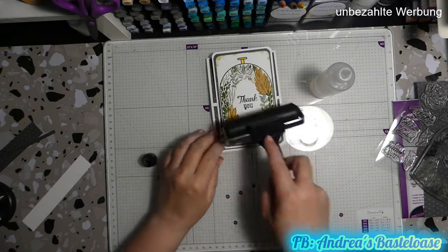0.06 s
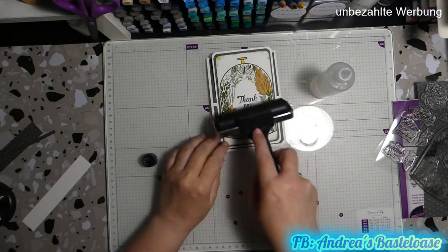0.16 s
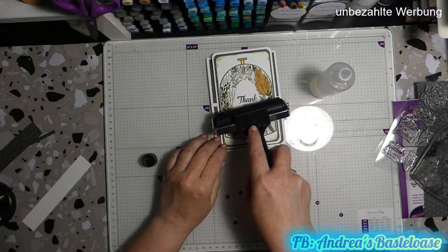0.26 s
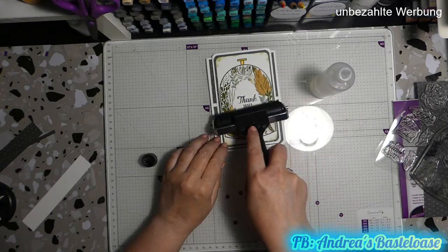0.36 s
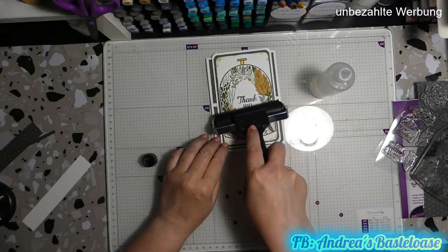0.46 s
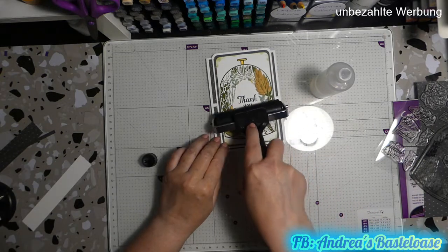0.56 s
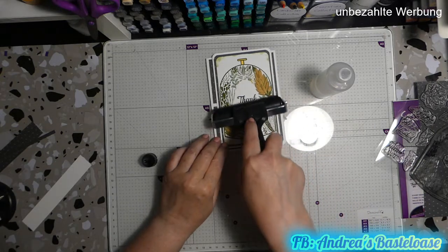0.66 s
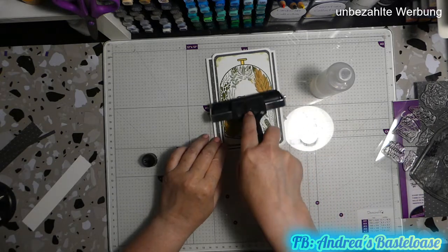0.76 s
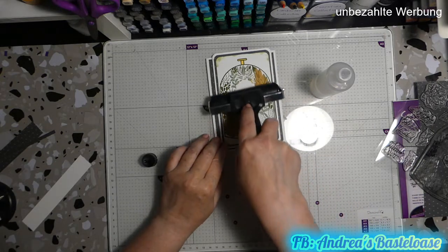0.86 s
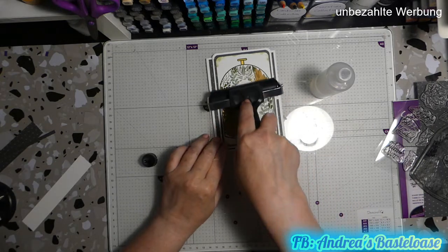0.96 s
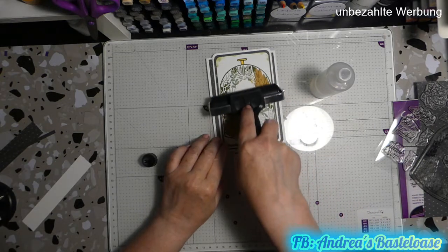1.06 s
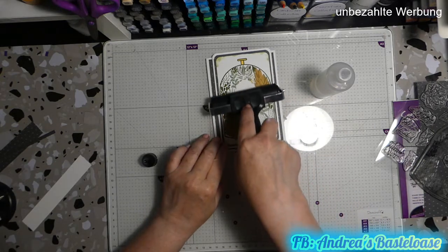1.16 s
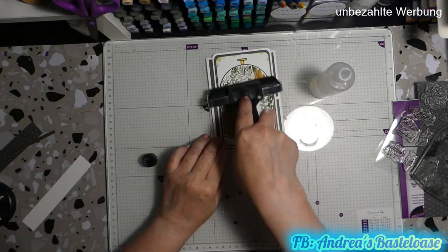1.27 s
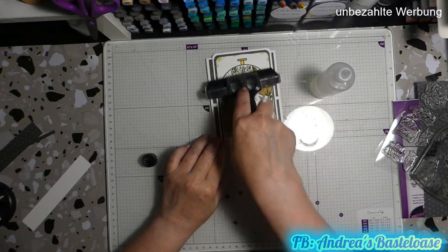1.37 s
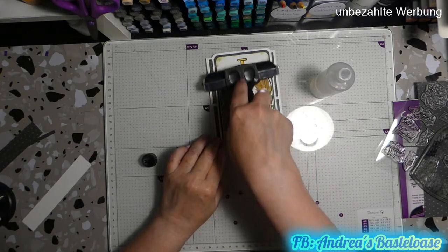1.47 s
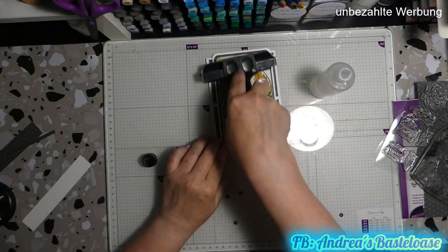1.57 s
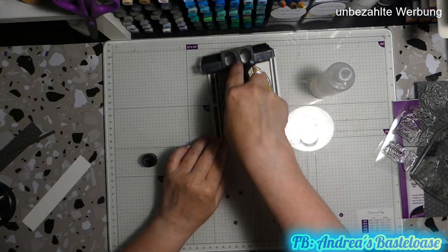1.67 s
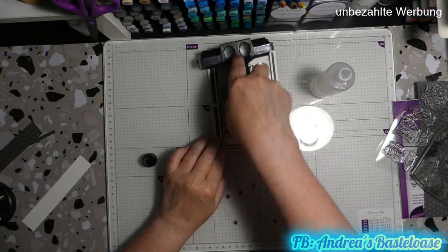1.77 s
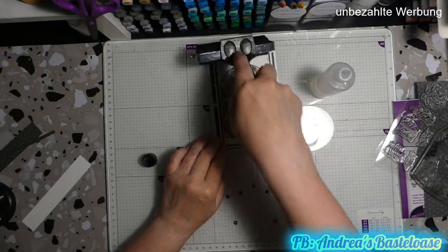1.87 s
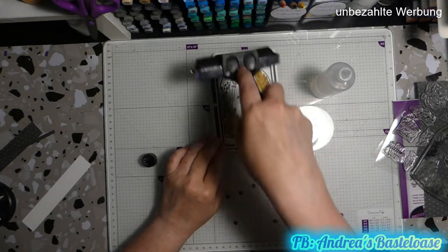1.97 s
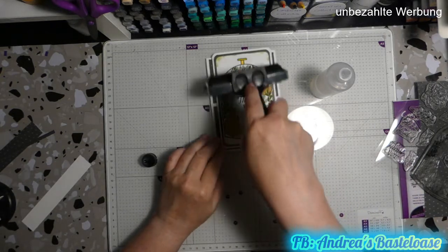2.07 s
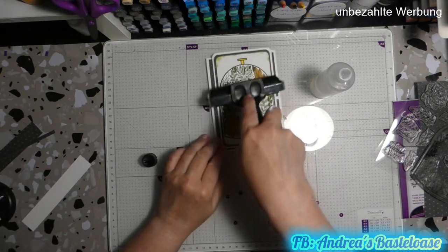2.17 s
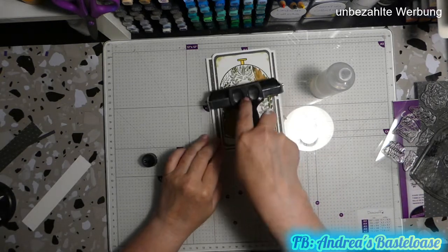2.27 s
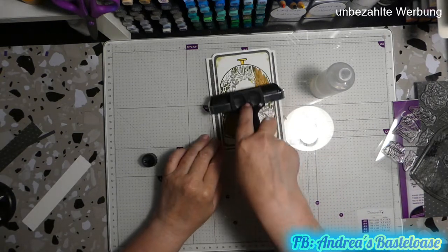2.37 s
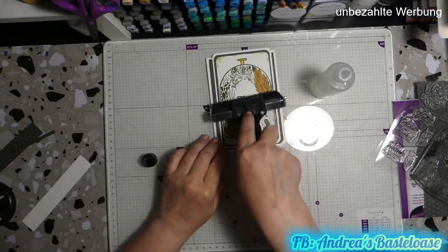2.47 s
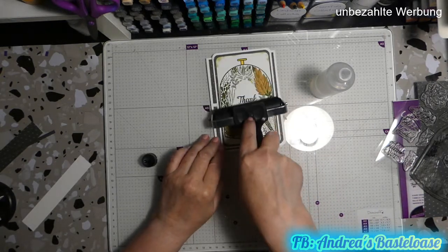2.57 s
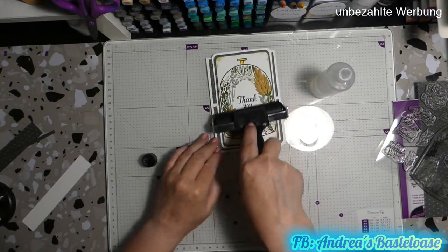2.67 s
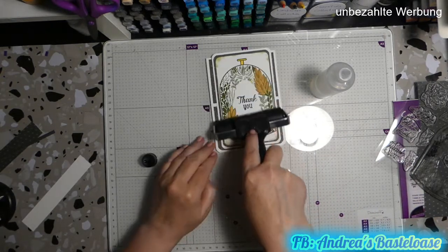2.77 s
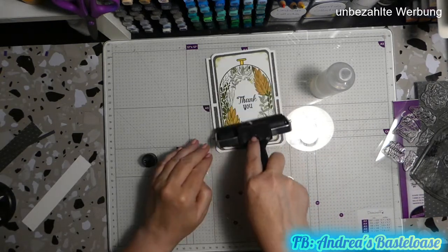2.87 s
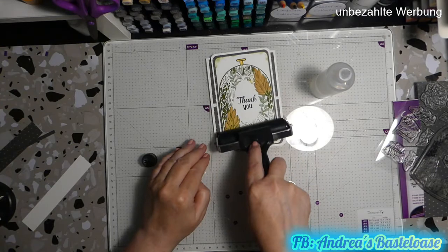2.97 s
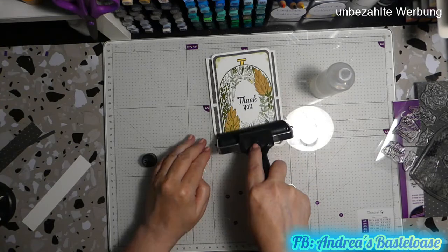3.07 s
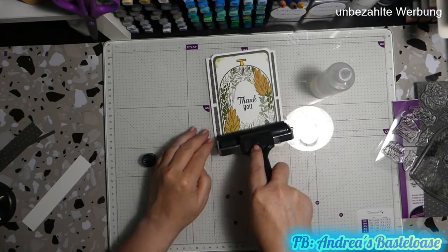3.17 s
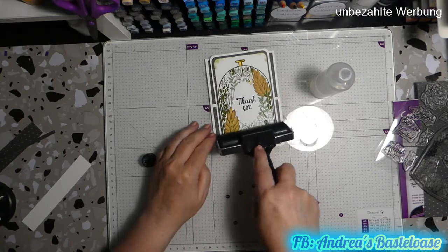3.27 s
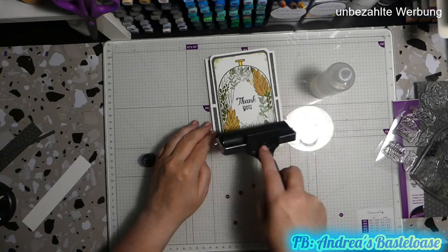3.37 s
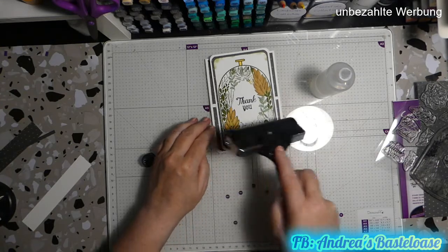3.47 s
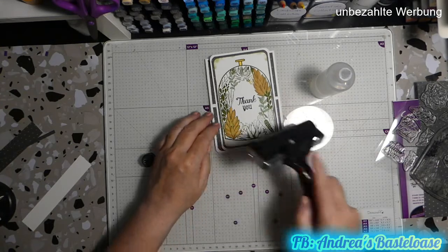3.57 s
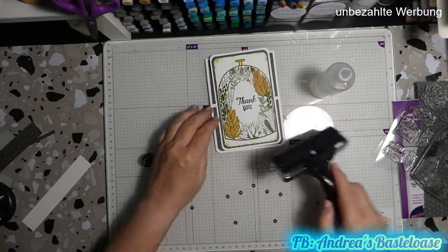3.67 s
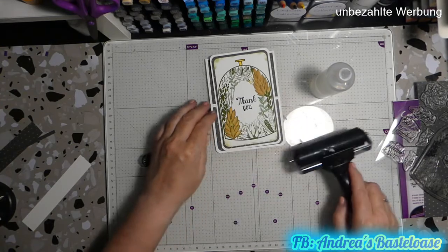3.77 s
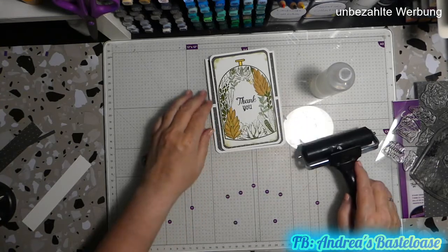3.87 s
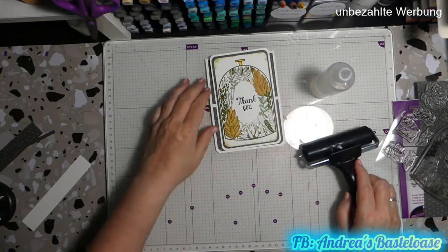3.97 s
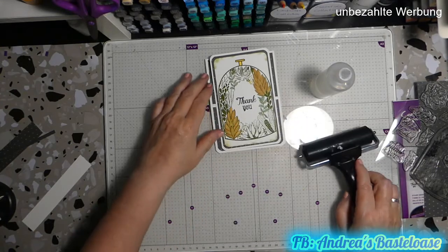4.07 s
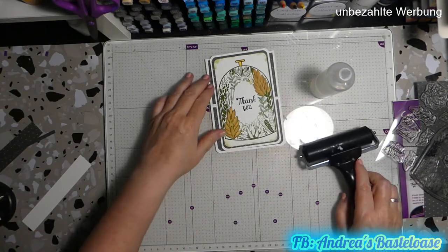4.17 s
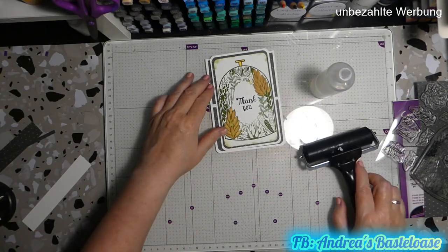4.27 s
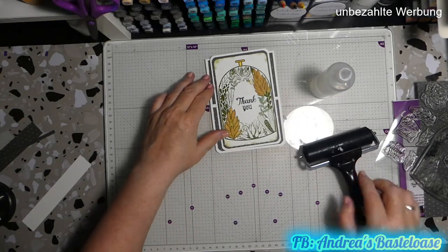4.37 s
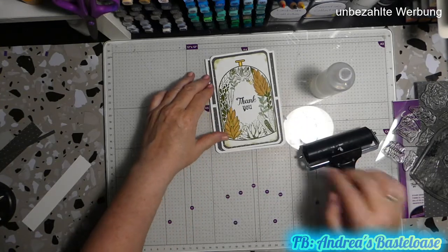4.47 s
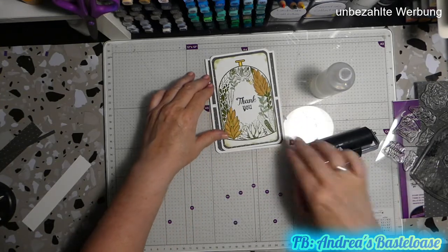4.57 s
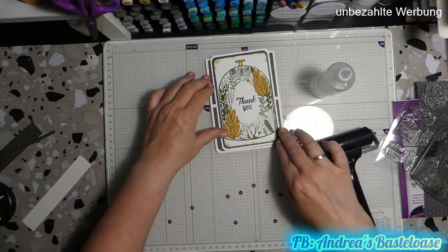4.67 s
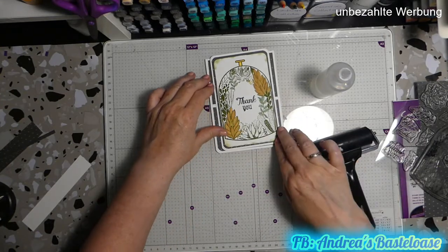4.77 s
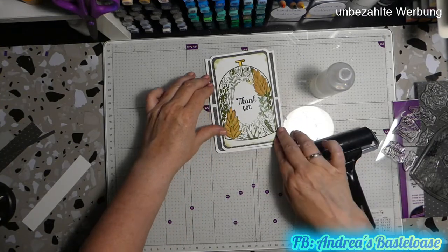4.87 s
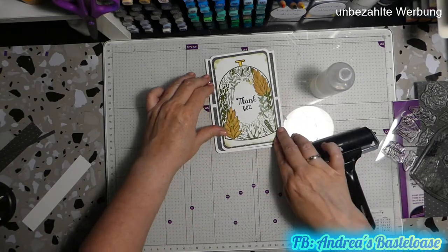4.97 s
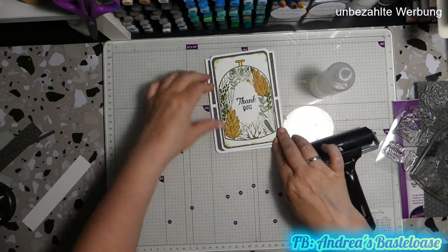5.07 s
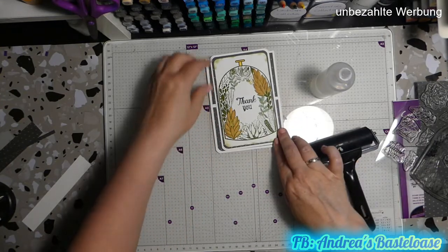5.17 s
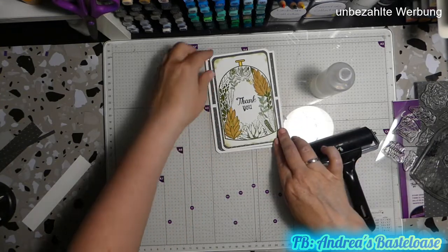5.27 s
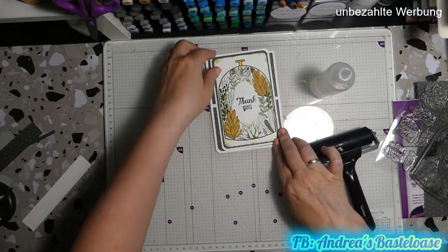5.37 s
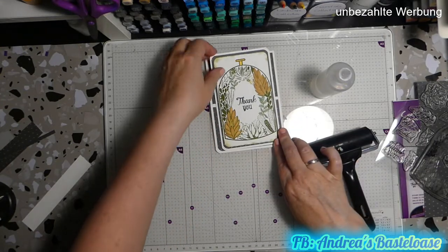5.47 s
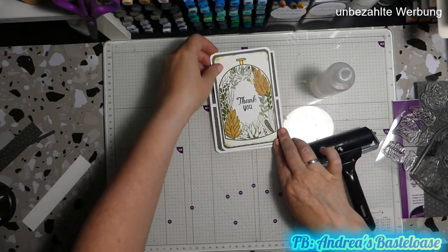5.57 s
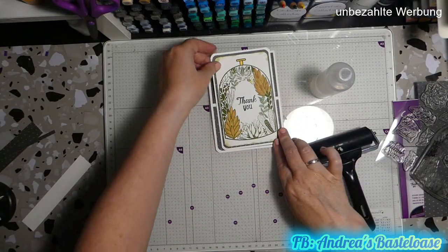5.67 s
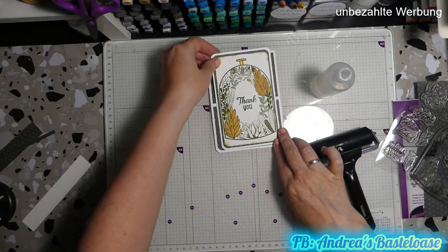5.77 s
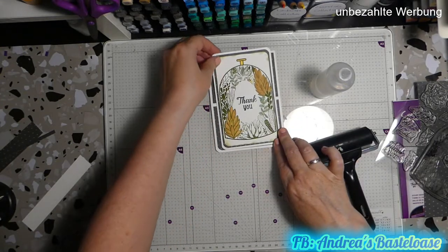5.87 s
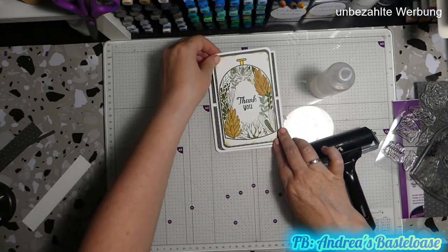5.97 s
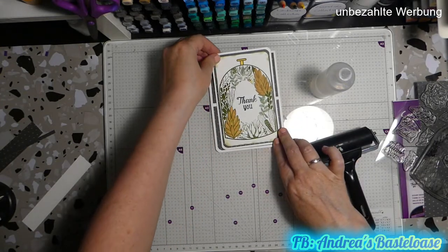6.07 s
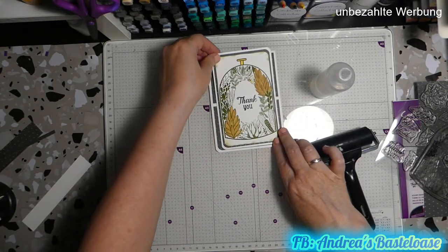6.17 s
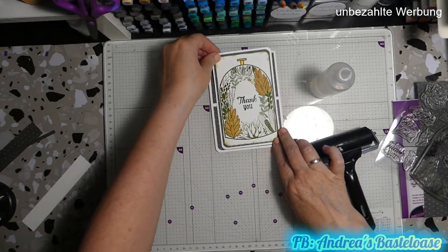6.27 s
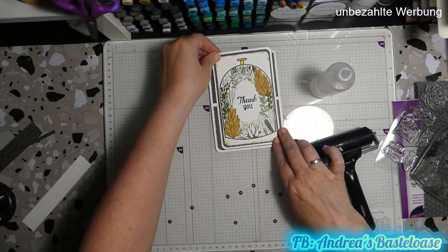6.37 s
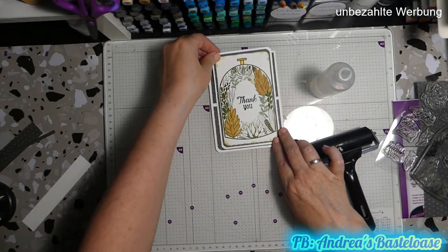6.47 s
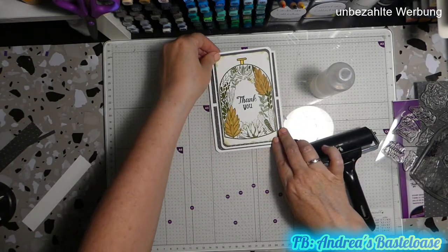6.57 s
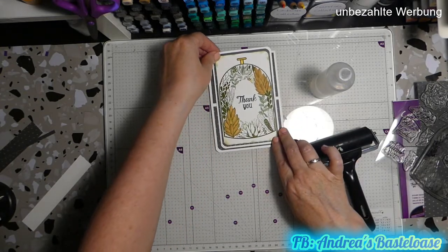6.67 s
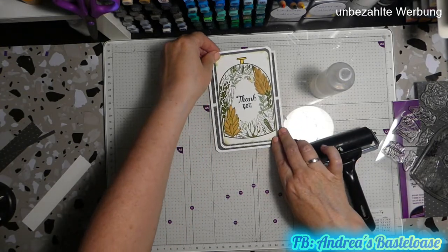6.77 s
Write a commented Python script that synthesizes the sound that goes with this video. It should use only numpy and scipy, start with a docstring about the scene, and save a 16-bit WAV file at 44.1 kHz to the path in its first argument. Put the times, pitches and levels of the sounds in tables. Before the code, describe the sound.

A steady, soft, wide hiss of room air and microphone noise runs throughout. At about 0.3 seconds a rubber roller lands on a craft table with a clustered, dull thud and a slight rub. From 0.6 to 3.1 its sticky drum fizzes very faintly over paper in three pushes, with dry axle ticks, the clearest near 1.0, and weak plastic knocks around 1.8 and 2.4. A small rub at 3.15 leads to a tight, bright click cluster at 3.25 as it is lifted. At 3.9 the drum hits the table with a loud, woody thump; at 4.23 the plastic handle drops with a loud, hard clack and brief chatter. Afterwards fingers land softly near 4.9, 5.0, 5.3 and 6.4, with faint card rubs around 5.6 to 5.9 and 6.7. The room is small and dry, the microphone overhead.

```python
"""A hand roller is put on a paper card on a craft table, rolled up and back, lifted and laid aside.
The tacky drum fizzes off the paper as filtered crackle; its loose axle ticks in short decaying modes.
The rubber drum thumps the table and the plastic handle drops with a clack: modes plus noise bursts.
Then fingers nudge the card, with soft thumps and rubs of crackle. The room is small and dry;
a hissy camera microphone hangs overhead, with a limiter."""
import sys
import numpy as np
from scipy import signal
from scipy.fft import rfft, irfft
from scipy.io import wavfile
from scipy.ndimage import minimum_filter1d

SR = 44100
rng = np.random.default_rng(int(sys.argv[2]) if len(sys.argv) > 2 else 0)


def output_pcm(signal):
    """Save a mono or channel-first signal as 16-bit PCM at the path in sys.argv[1].

    Samples are clipped to [-1, 1] before scaling.
    """
    pcm = np.clip(np.atleast_2d(signal).T, -1, 1) * 32767
    wavfile.write(sys.argv[1], SR, np.round(pcm).astype(np.int16))


N = 301203  # length in samples


def amp(db):
    """Turns dB into an amplitude factor."""
    return 10 ** (np.asarray(db) / 20)


def unit(x):
    """Scales to an energy of one."""
    return x / np.sqrt(np.sum(x ** 2) + 1e-30)


def read(points, hz):
    """Joins points by straight lines on a log-frequency axis."""
    f, value = np.transpose(points)
    return np.interp(np.log(hz + 1), np.log(f + 1), value)


def add(mix, s, sound):
    """Mixes a sound in at time s."""
    part = mix[round(s * SR):][:len(sound)]
    part += sound[:len(part)]


def colour(x, points, tilt_db=0, size=4096):
    """Causal minimum-phase filter with the given spectrum, tilted by dB per octave."""
    hz = np.maximum(abs(np.fft.fftfreq(size, 1 / SR)), 20)
    log_gain = np.log(amp(read(points, hz) + tilt_db * np.log2(hz)))
    spectrum = np.exp(np.conj(signal.hilbert(log_gain)))
    taps = np.fft.ifft(spectrum).real
    return signal.oaconvolve(x, taps[:size // 2])[:len(x)]


def soften(x, hz, order=2):
    """A softer contact lasts longer and leaves the high modes quiet."""
    low_pass = signal.butter(order, min(hz, .45 * SR), fs=SR, output="sos")
    return signal.sosfilt(low_pass, x)


def at_level(x, db):
    """Gives a blow the energy of 5 ms at this rms level."""
    return amp(db) * unit(x) * np.sqrt(.005 * SR)


def crackle(length, per_s, spread_db):
    """Tiny slips at random moments, a few of them large."""
    chance = rng.random(length)
    size = rng.exponential(1, length)
    sign = rng.standard_normal(length)
    return sign * amp(spread_db * np.minimum(size, 4)) * (chance < per_s / SR)


def ring(modes, tilt_db=0, opposed=False, size=16384):
    """Decaying modes; opposed neighbours cancel at first, so their sum swells and beats."""
    t = np.arange(size) / SR
    out = np.zeros(size)
    for k, (hz, db, t60) in enumerate(modes):
        mode = unit(amp(-60 * t / t60) * np.sin(2 * np.pi * hz * t))
        sign = (-1) ** (k * opposed)
        out += sign * amp(db + tilt_db * np.log2(hz)) * mode
    return unit(out)


def burst(grain, t60, crack_db, tilt_db=0, size=16384):
    """The crack of first contact, then dense modes that die fast."""
    t = np.arange(size) / SR
    push = unit(rng.standard_normal(size) * amp(-60 * t / t60))
    push[0] += amp(crack_db)
    return unit(colour(push, grain, tilt_db))


# Spectrum of room air and microphone noise. Each row: frequency in Hz, relative level in dB per Hz.
HISS = [(15, -43.5), (25, -9.5), (70, -16.5), (149, -4), (373, -7), (416, -2), (451, -7), (677, -9.5),
        (911, -10.5), (1370, -14), (1520, -16.5), (1740, -14), (3430, -21), (10100, -19), (16000, -22.5)]
# One resonance where the room noise gathers. A single row: frequency in Hz, width in Hz, boost in dB.
AIR_MODE = (420, 30, 3)
# Stereo width of the noise. Each row: frequency in Hz, side against mid in dB.
HISS_WIDTH = [(60, 6.5), (110, 5.5), (200, 10), (380, 6), (700, 5.5), (1290, 4.5), (2380, 1.5),
              (4400, -1.5), (8120, -4.5), (15000, -2.5)]
# Balance of the noise. Each row: frequency in Hz, left against right in dB.
HISS_LEAN = [(60, 0), (200, -3), (700, -1.5), (2400, -.5), (8000, .5)]
HISS_DB = -59  # rms of the mean of both channels


def hiss():
    """Steady room air and microphone noise: wide in the bass, central in the treble."""
    hz = np.fft.rfftfreq(N, 1 / SR)
    mode_hz, width, mode_db = AIR_MODE
    resonance_db = mode_db / (1 + (2 * (hz - mode_hz) / width) ** 2)
    shape = amp(read(HISS, hz) + resonance_db)
    mid, side = rfft(rng.standard_normal((2, N))) * shape
    side = side * amp(read(HISS_WIDTH, hz))
    lean = amp(read(HISS_LEAN, hz) / 2)
    pair = irfft(np.array([(mid + side) * lean, (mid - side) / lean]), N)
    return amp(HISS_DB) * pair / pair.mean(0).std()


# Surfaces near the table. Each row: delay in seconds, strength against the direct sound.
ECHOES = [(.0013, 0.087), (.0021, 0.16), (.0033, .2), (0.017, 0.074)]
# Dying away of the small dry room. Each row: frequency in Hz, time to fall 60 dB in seconds.
ROOM_T60 = [(120, 0.23), (400, 0.27), (1500, 0.16), (5000, 0.18), (12000, .15)]
# Strength of the room's tail at mid. Each row: frequency in Hz, level against the direct sound in dB.
ROOM_COLOUR = [(120, -13), (400, -13.5), (1500, -11.5), (5000, -12.5), (12000, -14)]
# Echoes unlike at the microphone's two ports. Each row: frequency in Hz, level in dB.
SCATTER = [(100, -19), (700, -14), (2500, -10), (5000, -14), (9000, -10), (16000, -11)]


def room(x, side_share=.6, onset_s=.003, scatter_t60=0.017, size=22050):
    """Direct sound, echoes off nearby surfaces and a short diffuse tail."""
    age = np.arange(size) / SR
    near = np.zeros(size)
    near[0] = 1
    for delay, strength in ECHOES:
        add(near, delay, np.array([strength]))
    hz, t, z = signal.stft(rng.standard_normal((2, size)), SR, nperseg=256)
    t60 = read(ROOM_T60, hz)[:, None]
    decay = amp(read(ROOM_COLOUR, hz)[:, None] - 60 * t / t60)
    # a longer tail starts lower, so that the colour sets its energy
    z = z * decay * np.sqrt(2 * np.log(1000) / (t60 * SR))
    tail = signal.istft(z, SR, nperseg=256)[1][:, :size]
    mid, side = tail * (1 - np.exp(-age / onset_s))
    # clutter on the table scatters the first milliseconds differently to each port
    scatter = unit(rng.standard_normal(size) * amp(-60 * age / scatter_t60))
    side = side_share * side + colour(scatter, SCATTER)
    response = unit(near) + np.array([mid + side, mid - side])
    return signal.fftconvolve(x[None], response, axes=1)[:, :N]


# Modes of the table with its mat. Each row: frequency in Hz, relative energy in dB, t60 in seconds.
TABLE_MODES = [(210, -12.5, 0.15), (429, 4.5, .045), (470, -7.5, 0.14), (593, -5.5, 0.036),
               (734, -3.5, 0.057), (840, -5, .03), (990, -9, .03), (1190, -13, 0.13), (1310, -22, 0.057)]
# Dense upper modes of the table. Each row: frequency in Hz, relative level in dB per Hz.
TABLE_GRAIN = [(60, -37), (120, -8.5), (300, -6.5), (1200, -2), (2400, -6), (3500, -6), (5000, -6),
               (16000, -16.5)]
# Low standing waves of the room. Each row: frequency in Hz, relative energy in dB, t60 in seconds.
STANDING = [(128, -7, 0.14), (151.4, -2, 0.15), (197, -2.5, .14), (238, 2.5, 0.14), (272, -13, .08),
            (370, 1.5, 0.085), (400, -5, .06)]


def thump(hz, grain_db=-11, boom_db=-3, boom_delay_s=.009):
    """One blow on the table; the room booms a moment later."""
    blow = ring(TABLE_MODES) + amp(grain_db) * burst(TABLE_GRAIN, t60=.06, crack_db=-11.5)
    add(blow, boom_delay_s, amp(boom_db) * ring(STANDING, opposed=True))
    return soften(blow, hz, order=4)


# Fingertips landing on card and mat.
# Each row: start in seconds, level in dB over 5 ms, hardness as a cut-off in Hz.
TOUCHES = [(4.866, -50, 300), (5.005, -46, 798), (5.33, -50.5, 260), (6.412, -56.5, 700),
           (6.447, -54.5, 1100)]


def fingertips():
    """Fingertips land on the table as soft thumps without rebound."""
    out = np.zeros(N)
    for s, db, hz in TOUCHES:
        add(out, s, at_level(thump(hz), db))
    return out


# Fingers and card rubbing.
# Each row: start in seconds, length in seconds, rms level in dB, tilt in dB per octave.
RUBS = [(.322, .052, -52.5, 3), (1.073, 0.031, -54.5, -3), (2.379, .049, -56, 4.5),
        (3.157, .045, -49.5, -3), (3.427, .052, -57.5, -2), (3.623, 0.1, -60.5, 2.5),
        (5.581, 0.06, -57.5, 3), (5.646, 0.043, -56, -2), (5.698, 0.29, -61.5, 2),
        (5.8, 0.077, -62.5, -3.5), (6.701, 0.034, -61, -3)]
# Spectrum of a rub before its tilt. Each row: frequency in Hz, relative level in dB per Hz.
RUB_COLOUR = [(80, -43), (300, -18.5), (900, -13), (1400, 1.5), (2500, 1), (4000, -2.5), (8000, -7.5),
              (16000, -11)]
# each fingertip slips as it lands: length, level against its thump, dB per octave
SLIP_S, SLIP_DB, SLIP_TILT_DB = 0.037, -13.5, 3


def rubs():
    """Short strokes of friction that swell quickly and fade; each landing fingertip adds one."""
    out = np.zeros(N)
    landings = [(s, SLIP_S, db + SLIP_DB, SLIP_TILT_DB) for s, db, _ in TOUCHES]
    for s, length, db, tilt_db in list(RUBS) + landings:
        u = np.linspace(0, 1, max(round(length * SR), 64))
        swell = np.sin(np.pi * np.sqrt(u))
        slips = crackle(len(u), per_s=4000, spread_db=1.1) * swell
        add(out, s, amp(db) * np.sqrt(len(u)) * unit(colour(slips, RUB_COLOUR, tilt_db)))
    return out


# Blows of drum and handle on the table.
# Each row: start in seconds, level in dB over 5 ms, hardness as a cut-off in Hz.
KNOCKS = [(0.3281, -26.5, 400), (0.3457, -21, 480), (0.3541, -21.5, 165), (3.2625, -33.5, 1500),
          (3.9132, -7, 2600), (4.2342, -25.5, 239.6)]
# the drum rocks after a blow: time between contacts, loss at each, upper limit of their hardness
ROCK_S, ROCK_DB, ROCK_HZ = .0215, -11.5, 260


def table(count=3):
    """The drum and handle thump the table, each blow rocking to rest in softer contacts."""
    out = np.zeros(N)
    for s, db, hz in KNOCKS:
        for k in range(count):
            hardness = min(hz, ROCK_HZ) if k else hz
            add(out, s + k * ROCK_S, at_level(thump(hardness), db + k * ROCK_DB))
    return out


# Modes of the plastic frame and handle.
# Each row: frequency in Hz, relative energy in dB, t60 in seconds.
FRAME_MODES = [(1135, -14, 0.042), (1282, -9, 0.059), (1750, -13.5, 0.051), (1905, -8.5, .06),
               (2080, -3.5, .02), (2255, -0.5, 0.04), (2665, -6, .06), (2910, -9.5, 0.044),
               (3094, -7.5, 0.0403), (3380, -11, 0.014), (3920, -23, .09), (4260, -12.5, .04),
               (4560, -4.5, 0.039), (4990, -2, .018), (5600, -10, .03), (6100, -14, .025),
               (6930, -16, 0.074), (9800, -15.5, .01), (12290, -18, .007)]
# Dense upper modes of the frame. Each row: frequency in Hz, relative level in dB per Hz.
FRAME_GRAIN = [(60, -40.5), (200, -13.5), (700, -6), (1300, -2.5), (3200, -1.5), (6500, -3), (8500, -15.5),
               (12000, -11), (16000, -18.5)]
# Knocks of the frame, also when the resting hand shifts it.
# Each row: start in seconds, level in dB over 5 ms, hardness as a cut-off in Hz.
CLACKS = [(0.3173, -46.5, 1490), (.3295, -42.5, 1590), (.351, -47, 1480), (0.731, -48, 9050),
          (1.797, -44, 3900), (2.205, -53.5, 1480), (2.404, -43.5, 7050), (2.445, -44.5, 7000),
          (3.1565, -40, 3440), (3.2471, -37, 9000), (3.265, -24, 6900), (3.9135, -38.5, 4060),
          (4.2337, -7.5, 14160), (5.613, -47, 2950)]
# the frame chatters: first gap, growth of the gaps, upper limit of the rebounds' hardness
CHATTER_S, CHATTER_STRETCH, CHATTER_HZ = .0027, 1.9, 2700
# loss per rebound after a 0 dB knock; weaker knocks lose more (dB per dB)
CHATTER_DB, CHATTER_PER_DB = -4.5, 0.75


def frame(grain_db=-6, count=4):
    """The plastic frame knocks against drum and table, then chatters in softer rebounds."""
    out = np.zeros(N)
    modes = ring(FRAME_MODES, opposed=True)
    for s, db, hz in CLACKS:
        loss_db = CHATTER_DB + CHATTER_PER_DB * db
        for k in range(count):
            blow = modes + amp(grain_db) * burst(FRAME_GRAIN, t60=0.018, crack_db=-9)
            hardness = min(hz, CHATTER_HZ) if k else hz
            add(out, s, at_level(soften(blow, hardness), db + k * loss_db))
            s += CHATTER_S * CHATTER_STRETCH ** k
    return out


# Modes of the axle in its seat, before any tilt.
# Each row: frequency in Hz, relative energy in dB, t60 in seconds.
AXLE_MODES = [(2100, 0, 0.016), (5190, 13.5, 0.0089), (6590, 14, 0.0045), (7660, -44.5, .012),
              (9830, -5.5, 0.009), (12600, 6.5, .009), (14500, 6, .009)]
# Dense upper modes of the axle, before any tilt. Each row: frequency in Hz, relative level in dB per Hz.
AXLE_GRAIN = [(200, -78.5), (800, -14), (1500, 0.5), (3500, 3), (5500, 12.5), (8000, 9), (11000, 15.5),
              (16000, 4.5)]


def tick(db, tilt_db, grain_db=5):
    """One jump of the axle in its seat: a few modes under a short noisy burst."""
    modes = ring(AXLE_MODES, tilt_db, opposed=True)
    grain = burst(AXLE_GRAIN, t60=0.025, crack_db=-11, tilt_db=tilt_db)
    return at_level(modes + amp(grain_db) * grain, db)


# Ticks of the loose axle. Each row: start in seconds, level in dB over 5 ms, tilt in dB per octave.
TICKS = [(0.6671, -33.5, 0.5), (0.689, -38, -1.5), (1.0357, -26, 2.5), (1.2906, -45.5, -2.5),
         (1.578, -43, -2), (1.762, -41.5, -3), (1.794, -39.5, 4), (2.223, -51.5, -3), (2.2906, -48.5, -4),
         (2.3746, -49.5, -4), (2.404, -36, -4.5), (2.4469, -47.5, -5), (2.5309, -35, -1),
         (2.6323, -45.5, 8), (2.6872, -45.5, 8), (3.1287, -38, -1.5), (3.249, -34, -4), (3.2551, -21, -3),
         (3.2599, -20.5, -2.5), (3.2648, -18, -6.5), (3.9168, -36.5, -7), (3.926, -41.5, -6.5)]
SETTLE_S, SETTLE_DB = 0.015, -22  # the axle settles back: delay, level against the tick


def axle():
    """The axle sticks, jumps and settles back."""
    out = np.zeros(N)
    for s, db, tilt_db in TICKS:
        add(out, s, tick(db, tilt_db))
        add(out, s + SETTLE_S, tick(db + SETTLE_DB, tilt_db))
    return out


PUSH_SKEW = .62  # below one, a push reaches top speed early and slows down for longer


def speed(u):
    """Speed of the drum (0-1) at the share u of a push."""
    return abs(np.sin(np.pi * np.clip(u, 0, 1) ** PUSH_SKEW))


PEEL_POWER = 1.2  # amplitude of the peeling grows as this power of speed
# faint ticks: rate at top speed, level against the peeling, spread, dB per octave
SNAPS_PER_S, SNAP_DB, SNAP_SPREAD_DB, SNAP_TILT_DB = 28, 3, 3.7, 3
RUMBLE_DB, RUMBLE_HZ = -4.5, 280  # the table shakes: level against the peeling, cut-off
# Spectrum of the drum peeling off the paper. Each row: frequency in Hz, relative level in dB per Hz.
PEEL_COLOUR = [(500, -9), (2000, -9), (5500, -2), (8000, -5), (11000, 1), (16000, -1.5)]
# Pushes of the drum over the card, two away and one back.
# Each row: start in seconds, length in seconds, level of the peeling at top speed in dB.
PUSHES = [(0.561, 0.52, -64), (1.162, 0.96, -66), (2.42, .72, -59)]


def rolling(count=40):
    """With speed the tacky drum fizzes off the paper, the table rumbles and the axle ticks faintly."""
    out = np.zeros(N)
    for s, length, db in PUSHES:
        place, chance = rng.random(count), rng.random(count)
        extra = SNAP_SPREAD_DB * rng.standard_normal(count)
        for u, luck, extra_db in zip(place, chance, extra):
            if luck < speed(u) * SNAPS_PER_S * length / count:
                add(out, s + u * length, tick(db + SNAP_DB + extra_db, SNAP_TILT_DB))
    t = np.arange(N) / SR
    level = sum(amp(db) * speed((t - s) / length) ** PEEL_POWER for s, length, db in PUSHES)
    slips = crackle(N, per_s=2700, spread_db=2.0)
    fizz = unit(colour(slips, PEEL_COLOUR))
    rumble = unit(soften(colour(slips, TABLE_GRAIN), RUMBLE_HZ, order=4))
    return out + level * np.sqrt(N) * (fizz + amp(RUMBLE_DB) * rumble)


def scene():
    """Table and handle a little to the right, card near the middle; the microphone misses deep bass."""
    right = room(fingertips() + table() + frame()) * amp([[-1], [1]])
    middle = room(rubs() + axle() + rolling()) * amp([[-.3], [.3]])
    low_cut = signal.butter(6, 100, "high", fs=SR, output="sos")
    return signal.sosfilt(low_cut, right + middle) + hiss()


def limiter(x, threshold_db=-3.5, hold_s=.16, recover_db_per_s=130, attack_s=.003):
    """Turns down within a few ms of an overload, holds, then recovers."""
    over_db = np.maximum(20 * np.log10(abs(x).max(0) + 1e-9) - threshold_db, 0)
    half = max(round(hold_s * SR / 2), 1)
    # largest overload of the last hold_s seconds
    held_db = -minimum_filter1d(-over_db, 2 * half + 1, origin=half)
    fall = np.arange(N) / SR * recover_db_per_s
    cut_db = np.maximum.accumulate(held_db + fall) - fall
    r = np.exp(-1 / (attack_s * SR))
    return x * amp(-signal.lfilter([1 - r], [1, -r], cut_db))


EDGE_HZ = 15950  # upper band limit


def record(dry):
    """Limiter, soft overload of what slips through, then the band limit."""
    x = limiter(dry)
    x = x / (1 + x ** 6) ** (1 / 6)
    band_limit = signal.firwin(255, EDGE_HZ, window=("kaiser", 9), fs=SR)
    return signal.oaconvolve(x, band_limit[None], "same")


dry = scene()
out = record(dry)
output_pcm(out)
```